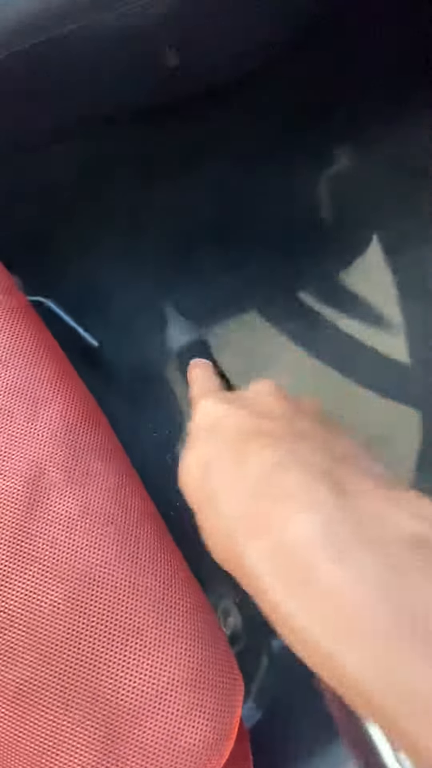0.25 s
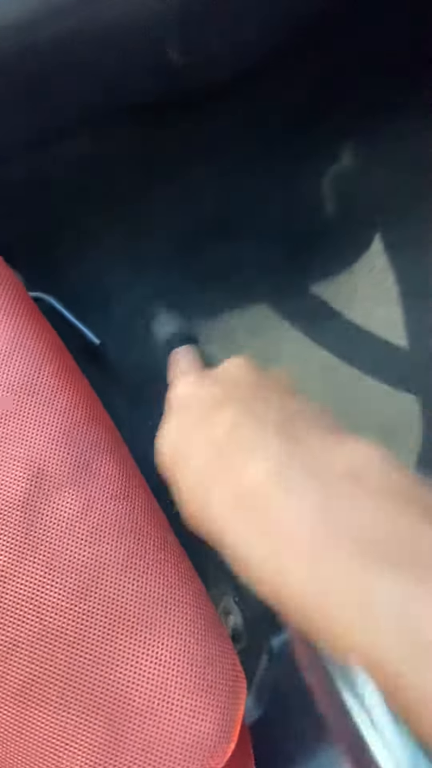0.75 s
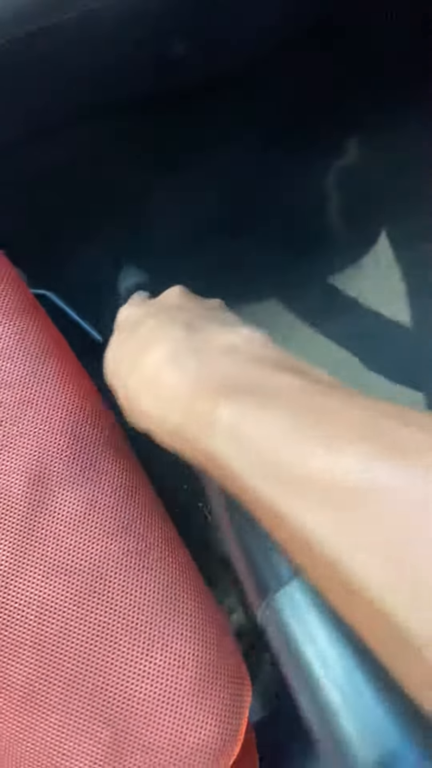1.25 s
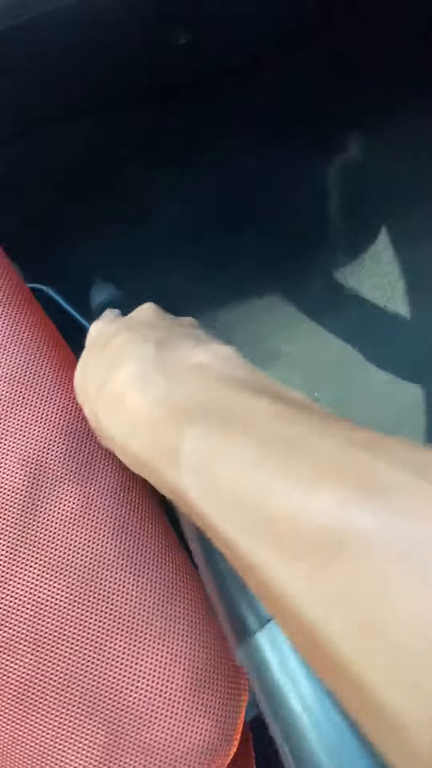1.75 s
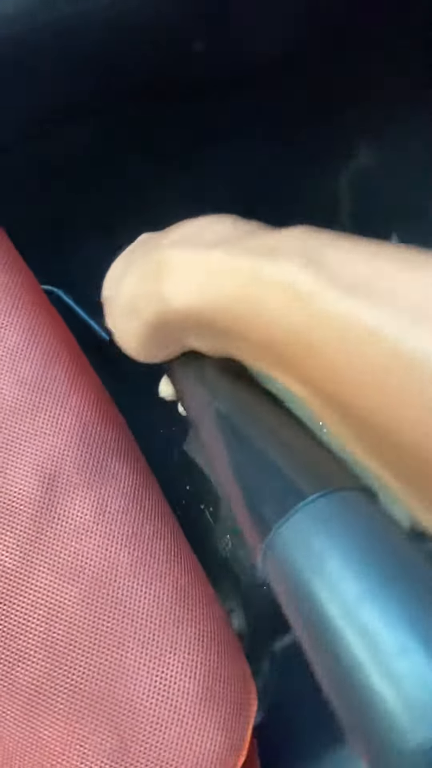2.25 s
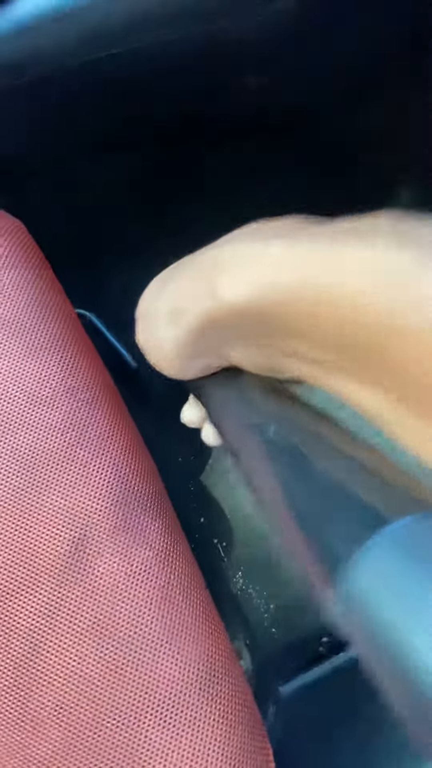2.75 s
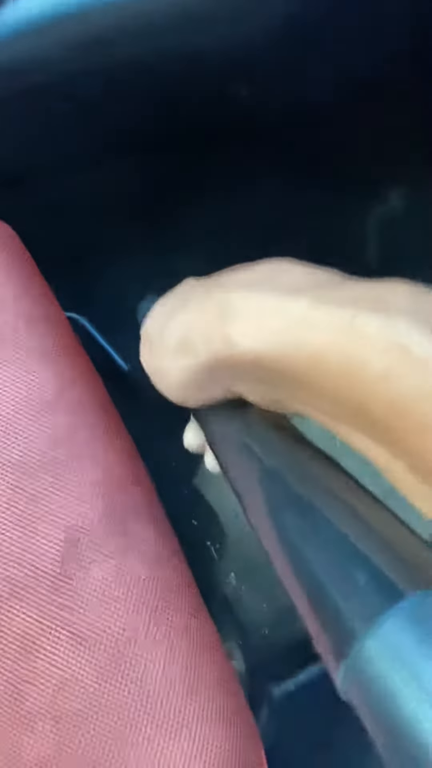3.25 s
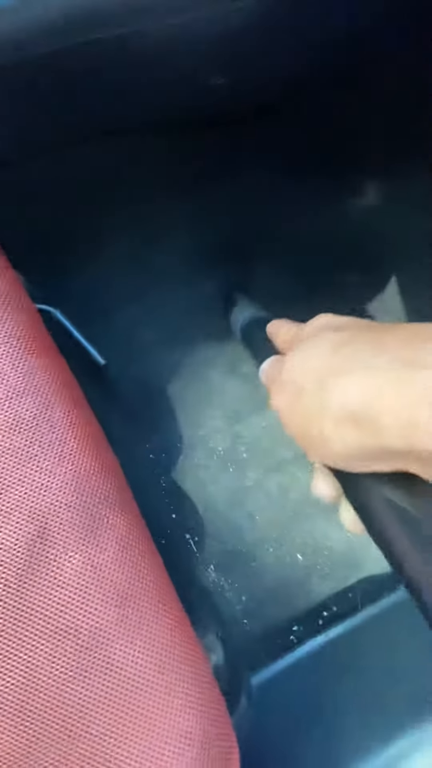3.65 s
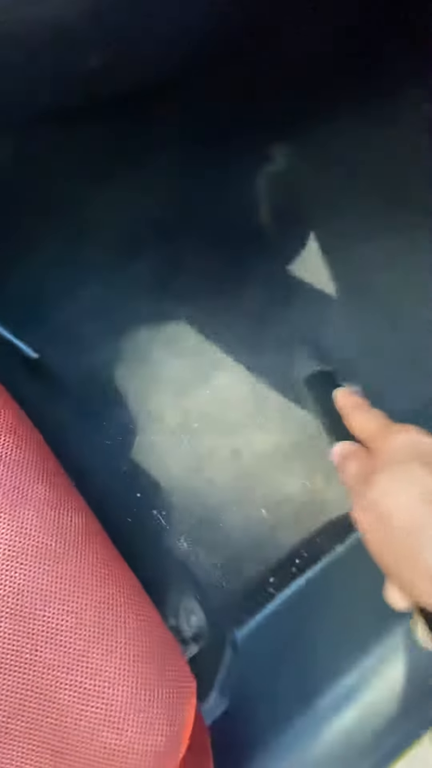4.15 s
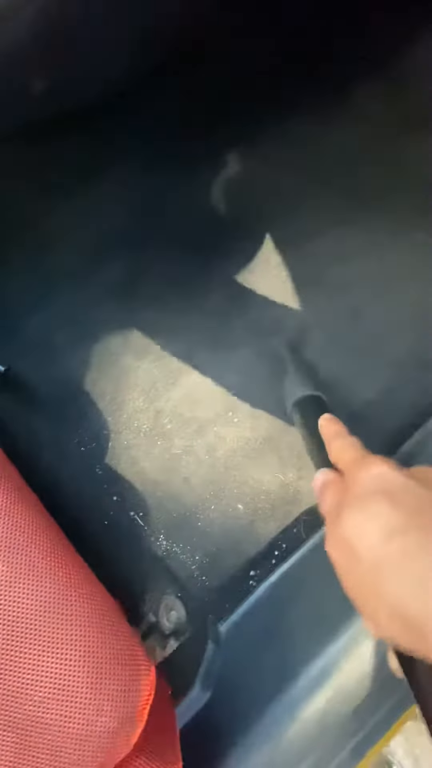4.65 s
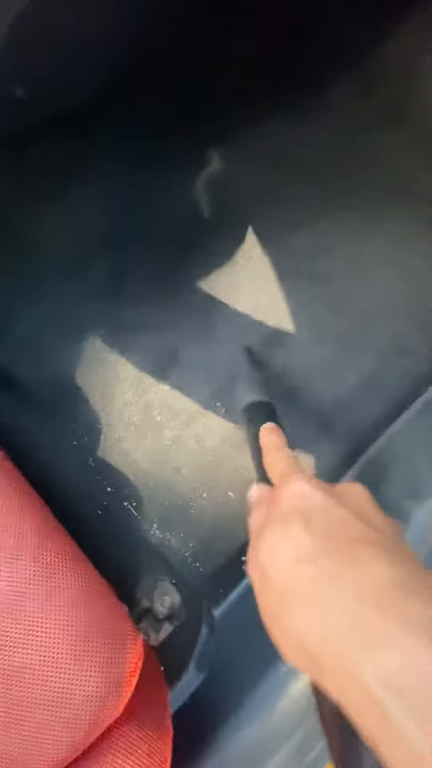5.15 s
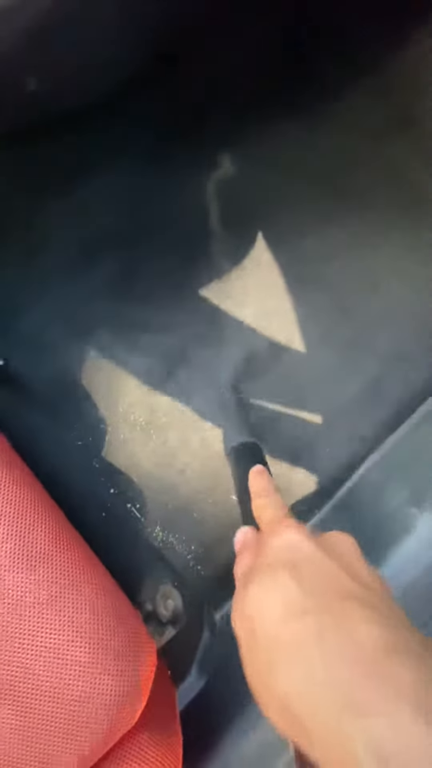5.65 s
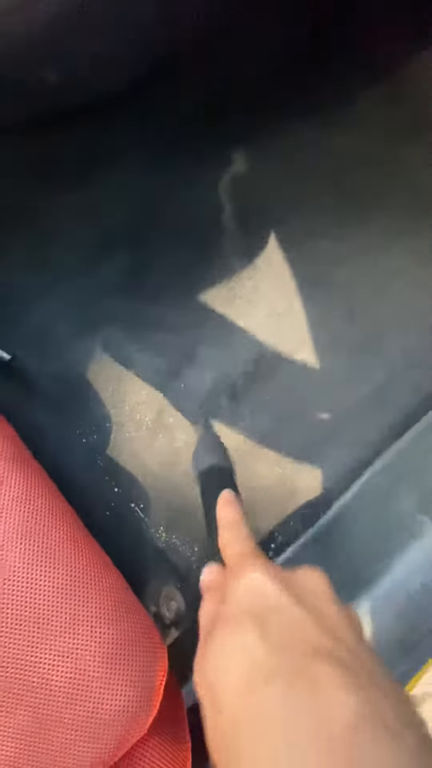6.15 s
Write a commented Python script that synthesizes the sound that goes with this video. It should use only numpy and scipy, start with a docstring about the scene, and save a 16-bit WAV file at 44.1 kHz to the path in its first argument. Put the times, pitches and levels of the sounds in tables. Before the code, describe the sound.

Inside an idling car, a vacuum nozzle sucks and scrubs at the floor mat, knocking sharply against plastic trim.

```python
"""A crevice nozzle works a car floor mat over steady air noise and an idling engine booming in the cabin.
Air hisses in through light strokes; pressed into the pile (0.8-2.2 s) the nozzle roars in the tube's
resonances and raps the trim (1 s). Scrubbing follows, then from 3.4 s lighter brushing and a clearer
motor whine. A crossfade briefly dips the engine's level (4.5 s); a softer rap (5.1 s) and two strokes
(6 s) follow. Left and right are alike in the bass; above 11 kHz the hiss is in opposite polarity."""
import sys
import numpy as np
from scipy import signal
from scipy.fft import rfft, irfft
from scipy.io import wavfile

SR = 44100
rng = np.random.default_rng(int(sys.argv[2]) if len(sys.argv) > 2 else 0)


def unload_wav(signal):
    """Save mono or channel-first audio to the path in sys.argv[1] as 16-bit WAV at rate SR, clipped to [-1, 1]."""
    wavfile.write(
        sys.argv[1],
        SR,
        np.round(np.clip(np.atleast_2d(signal).T, -1, 1) * 32767).astype(np.int16),
    )


N = 282240
T = np.arange(N) / SR
HZ = np.maximum(np.arange(N // 2 + 1) * SR / N, 1)

# Stereo image of far sources, near sources and, in the treble, both:
# (frequency [Hz], left minus right [dB], likeness [0-1], left lead [rad])
FAR_IMAGE = [(30, .3, .999, 0), (122, 1.25, .999, -.1), (250, 2.5, .99, -.1), (400, 3.8, .92, -.1),
             (600, .5, .62, -.95), (1100, 2.5, .43, -1.05), (1600, 0, .55, -.5), (2000, -2, .36, -.8),
             (2900, -2, .75, -2.15), (3800, -2.2, .63, -3.2)]
NEAR_IMAGE = [(400, 2.6, .96, -.16), (500, 4.3, .9, -.86), (600, -1.3, .82, -1.76), (700, -1.9, .66, -1.2),
              (800, 2.7, .9, -1.06), (950, -9, .6, .5), (1100, -1.7, .96, .34), (1300, -3.5, .8, .1),
              (1600, -3, .6, -.6), (2000, .5, .38, -2.6), (2900, -.7, .65, -2.6), (3400, .3, .6, -3.4)]
TREBLE_IMAGE = [(4200, -3, .25, -4.5), (4700, -2.3, .35, -3.2), (5400, -1.5, .68, .1), (6000, -3, .58, .2),
                (7000, 0, .7, .47), (8000, 1.7, .64, 1.78), (9500, 1.8, .55, 1.7), (10500, .8, .7, 2.57),
                (11300, 0, .95, 3.08), (12200, 0, 1, np.pi)]


def amp(db):
    """Decibels to gain."""
    return 10 ** (np.asarray(db) / 20)


def in_time(rows):
    """A (time, value) curve, per sample."""
    return np.interp(T, *np.transpose(rows))


def in_hz(rows):
    """Table columns interpolated over log frequency."""
    hz, *columns = np.transpose(rows)
    return [np.interp(np.log(HZ), np.log(hz), c) for c in columns]


def drift(corner_hz):
    """Slow random wander, standard deviation 1."""
    slow = irfft(rfft(rng.standard_normal(N)) / (1 + (HZ / corner_hz) ** 2), N)
    return slow / slow.std()


def gate(start_s, end_s):
    """Stroke envelope: swells ever faster until it bites, then stops short."""
    swell_s, bite_s, stop_s = 0.05, 0.02, 0.024
    swell = np.clip(1 + (T - start_s - bite_s) / swell_s, 0, 1) ** 3
    return swell * np.sin(np.pi / 2 * np.clip((end_s - T) / stop_s + .5, 0, 1)) ** 2


def resonances(modes):
    """Magnitude spectrum of resonances summed in power."""
    return np.sqrt(sum(amp(db) ** 2 / (1 + ((HZ - hz ** 2 / HZ) / width_hz) ** 2) ** 2
                       for hz, width_hz, db in modes))


def stereo(x, image):
    """Mono to left and right, with the image's balance and phase."""
    balance_db, _, lead_rad = in_hz(image + TREBLE_IMAGE)
    left_gain = amp(balance_db / 2) * np.exp(.5j * lead_rad)
    return irfft(rfft(x) * np.array([left_gain, 1 / left_gain]), N)


def noise(spectrum, image):
    """Coloured noise, partly common to both channels; rms 1."""
    alike = in_hz(image + TREBLE_IMAGE)[1]
    shared, *own = rfft(rng.standard_normal((3, N))) * spectrum
    blends = [irfft(np.sqrt(alike) * shared + np.sqrt(1 - alike) * part, N) for part in own]
    out = np.array([stereo(blend, image)[side] for side, blend in enumerate(blends)])
    return out / out.std()


def steady_air():
    """Airflow and engine rumble; the hose lifts a few bands."""
    spectrum = [(22, -33), (30, 14.5), (110, 11.5), (160, 11.5), (200, 6), (300, 11), (600, -3.5),
                (880, 1.5), (1400, -6.5), (2000, -4), (2900, -3.5), (3800, -15.5), (8000, -13.5),
                (10500, -57), (15000, -11)]  # (frequency [Hz], relative density [dB])
    hose_modes = [(2260, 160, -6), (2950, 120, 3), (4200, 520, 10.5), (4960, 390, 1)]  # (frequency [Hz], width [Hz], gain [dB])
    hose = np.sqrt(1 + resonances(hose_modes) ** 2)
    return amp(-28 + .5 * drift(27)) * noise(hose * amp(in_hz(spectrum)[0]), FAR_IMAGE)


def suction_motor():
    """Thin, wandering whine, heard better once the arm moves off."""
    levels = [(3.3, -48), (3.9, -44), (5.9, -42), (6.1, -48)]  # (time [s], rms level [dB])
    whine_hz = 545.7
    cycles = whine_hz * np.cumsum(1 + 0.00795 * drift(5.5)) / SR
    whine = np.sqrt(2) * amp(in_time(levels) + 1.8 * drift(32)) * np.sin(2 * np.pi * cycles)
    return stereo(whine, FAR_IMAGE)


def engine():
    """Sines on shaft orders: the fourth is the firing note, fractions come from unequal cylinders."""
    idle_speed = [(0.1, 31.33), (0.5, 30.56), (0.7, 30.35), (0.9, 30.54), (1.25, 31.17), (1.7, 31.03),
                  (2.15, 30.53), (2.9, 30.91), (3.3, 30.13), (3.5, 30.36), (4.0, 31.18), (4.25, 31.17),
                  (4.66, 30.33), (5.2, 30.63), (5.7, 30.18), (6.25, 30.12)]  # (time [s], shaft speed [Hz])
    orders = [(1.0, -31), (1.25, -40), (2.0, -31), (2.5, -38), (3.0, -26), (3.25, -41), (3.5, -31),
              (3.625, -31), (3.75, -36), (3.875, -35), (4.0, -9), (4.25, -37), (4.75, -38), (6.0, -44),
              (7.75, -39), (8.0, -29), (9.0, -42), (10.0, -36)]  # (multiple of shaft speed, base rms level [dB])
    cabin_boom = [(0, -3.5), (.5, 0.5), (1.5, -1.5), (2.2, 0), (2.9, -1), (3.4, 0), (4.2, -2), (4.7, 1),
                  (6.4, 1)]  # swell as the listener moves in the cabin: (time [s], gain [dB])
    first_overtone, crest_s = 7, 4.75  # whole orders from here up crest together and throb
    # A splice-like crossfade briefly dips the tone's level and shifts its phase.
    crossfade_s, crossfade_width_s, shift_turns = 4.47, 0.06, 0.114
    shaft_hz = in_time(idle_speed)
    turns = np.cumsum(shaft_hz) / SR
    turns -= turns[int(crest_s * SR)]
    lope_db = 1.5 + 7.5 * (shaft_hz - shaft_hz.mean())
    fade = np.clip((T - crossfade_s) / crossfade_width_s + .5, 0, 1)
    boom_db = in_time(cabin_boom)
    out = np.zeros(N)
    for order, db in orders:
        whole, overtone = order % 1 == 0, order >= first_overtone
        phase = 2 * np.pi * (order * turns + (.25 if whole and overtone else rng.random()))
        tone = (1 - fade) * np.sin(phase) + fade * np.sin(phase - 2 * np.pi * order * shift_turns)
        waver_db = .8 if whole and not overtone else 2.2  # firings differ
        swell_db = boom_db * ((order == 4) + 1.4 * overtone) + lope_db * (order == 2)
        out += np.sqrt(2) * amp(db + swell_db + waver_db * drift(13.5)) * tone
    return stereo(out, FAR_IMAGE)


def trim_raps():
    """The nozzle strikes the trim and rings its modes; in phase on both sides, a little louder right."""
    raps = [(1.0338, 0, 2), (5.1175, -12.5, 9)]  # (time [s], gain [dB], tilt [dB/octave])
    modes = [(1040, -21, 0.023), (1620, -1, 0.013), (2130, 4, 0.013), (2360, -3, 0.022), (2920, -8, 0.014),
             (4200, -1.5, 0.005)]  # (frequency [Hz], relative level [dB], T60 [s])
    pivot_hz, contact_s = modes[2][0], 0.00035
    out = np.zeros(N)
    for start_s, rap_db, tilt in raps:
        age_s = np.maximum(T - start_s, 0)
        contact = 1 - np.exp(-age_s / contact_s)
        for hz, db, t60_s in modes:
            level_db = rap_db + db + tilt * np.log2(hz / pivot_hz) - 9.5
            decay_db = 60 * np.minimum(age_s / t60_s, 4)
            out += contact * amp(level_db - decay_db) * np.sin(2 * np.pi * hz * age_s)
    return out * amp(db=[[-1], [1]])


def gestures():
    """Gains of the nozzle's layers from pressing, scrubbing and brushing; overlaps add in power."""
    press_roar = [(.8, -18), (.83, -25), (.91, -28.5), (1.03, -22.5), (1.14, -29), (1.17, -24), (1.22, -31),
                  (1.28, -23), (1.32, -27.5), (1.37, -24), (1.48, -28.5), (1.57, -18.5), (1.62, -33.5),
                  (1.71, -23), (1.77, -28.5), (1.89, -33), (1.94, -24.5), (2.03, -31), (2.18, -25.5)]  # held in the pile: (time [s], roar [dB])
    press_rub = [(.8, -30.5), (.92, -23), (1.05, -29.5), (1.2, -34.5), (1.85, -35.5), (2.18, -41)]  # pile friction meanwhile: (time [s], rub [dB])
    strokes = [(0.12, 0.217, -43, 0, -37), (0.213, 0.403, -34.5, 0.26, -32), (0.67, 0.804, -44.5, 0.3, -36),
               (2.165, 2.324, -23.5, 0.42, -26), (2.407, 2.516, -23.5, 0.2, -27),
               (2.618, 2.718, -25, 0.7, -38), (2.863, 2.98, -21.5, 0.33, -28.5),
               (3.073, 3.164, -24, 0.37, -34), (3.208, 3.283, -28.5, 0.4, -41),
               (3.271, 3.346, -27.5, 1, -31.5), (5.094, 5.196, -33.5, 1, -35),
               (5.946, 6.005, -36, 0.5, -32), (6.16, 6.305, -26.5, 0.73, -27)]  # scrubbing: (start [s], end [s], roar [dB], hollow share [0-1], rub [dB])
    brushes = [(0.106, 0.436, -49, -39), (0.676, 0.963, -45, -40), (3.414, 3.478, -36.5, -38.5),
               (3.955, 4.207, -40.5, -43), (4.386, 4.487, -39.5, -41), (5.088, 5.165, -37, -36),
               (5.943, 6.001, -33, -45), (6.161, 6.317, -29, -40.5)]  # lip over fibres: (start [s], end [s], swish [dB], rush [dB])
    jet_floor = [(0, -34), (.18, -31), (.22, -26), (.38, -28.5), (.43, -34.5), (.74, -34), (.81, -26),
                 (.95, -29.5), (2.15, -31.5), (2.36, -34.5), (2.8, -33.5), (3.2, -30), (3.5, -34)]  # hiss between strokes: (time [s], level [dB])
    press_hollow_share, hollow_lag_s = 0.2, 0.013  # the hollow sounds late, as a stroke closes it
    held = gate(press_roar[0][0], press_roar[-1][0])
    roar = (held * amp(in_time(press_roar))) ** 2
    rub = (held * amp(in_time(press_rub))) ** 2
    tube, hollow = (1 - press_hollow_share) * roar, press_hollow_share * roar
    scrub = np.zeros(N)
    for start_s, end_s, roar_db, hollow_share, rub_db in strokes:
        envelope = gate(start_s, end_s)
        power = (envelope * amp(roar_db)) ** 2
        tube += (1 - hollow_share) * power
        hollow += hollow_share * np.roll(power, int(hollow_lag_s * SR))
        scrub += power
        rub += (envelope * amp(rub_db)) ** 2
    swish, rush = scrub * amp(-14) ** 2, np.zeros(N)
    for start_s, end_s, swish_db, rush_db in brushes:
        envelope = gate(start_s, end_s)
        swish += (envelope * amp(swish_db)) ** 2
        rush += (envelope * amp(rush_db)) ** 2
    jet = amp(in_time(jet_floor)) ** 2 + scrub * amp(-8) ** 2  # strokes squeeze more air through the gap
    return np.sqrt([tube, hollow, rub, swish, rush, jet, scrub])


def air_hiss(jet_gain):
    """The jet hisses through the gap; the tip adds a whistly band while held down."""
    jet_spectrum = [(2500, 5.5), (3400, 5.5), (4600, 0), (5400, 4), (6500, 1), (8000, 3.5), (10500, 0),
                    (15000, -1.5)]  # (frequency [Hz], relative density [dB])
    tip_modes = [(6000, 380, -7), (6530, 540, -5)]  # (frequency [Hz], width [Hz], relative level [dB])
    tip_levels = [(.7, -46), (.85, -44), (1.6, -43), (2.2, -43.5), (2.75, -37.5), (3.4, -72)]  # (time [s], level [dB])
    highpass = 1 / (1 + (2500 / HZ) ** 4)
    jet = jet_gain * amp(1.4 * drift(11)) * noise(highpass * amp(in_hz(jet_spectrum)[0]), NEAR_IMAGE)
    tip = amp(in_time(tip_levels) + 2.5 * drift(13)) * noise(resonances(tip_modes), NEAR_IMAGE)
    return jet + tip


def tube_roar():
    """Turbulence rings resonances that follow the tube's wandering note."""
    note = [(.3, 1008), (.83, 1040), (1.3, 1083), (2.0, 1135), (2.3, 1094), (3.1, 1147), (3.4, 1056),
            (6.2, 1126)]  # (time [s], frequency [Hz])
    modes = [(1, 141, 5), (1.27, 256, -6.5), (1.55, 400, -16)]  # (ratio to the note, width [Hz], relative level [dB])
    cycles = np.cumsum(in_time(note) * (1 + .02 * drift(14))) / SR
    out = np.zeros(N)
    for ratio, width_hz, db in modes:
        i, q = irfft(rfft(rng.standard_normal((2, N))) / (1 + (2 * HZ / width_hz) ** 2), N)
        phase = 2 * np.pi * ratio * cycles
        out += amp(db) * (i * np.cos(phase) + q * np.sin(phase))
    return stereo(out / out.std(), NEAR_IMAGE)


def nozzle():
    """Tube and hollow roar, fibres scrape past the lip, air hisses above."""
    # Resonances: (frequency [Hz], width [Hz], relative level [dB])
    hollow_modes = [(805, 56, 9.5), (954, 170, 1.5)]  # cavity under the lip
    rub_modes = [(400, 115, -5.5), (477, 42, -2.5), (566, 100, -5), (687, 140, -9.5)]  # rubbed pile
    swish_modes = [(1400, 480, 6), (1820, 910, 5.5), (2390, 620, 7.5), (2800, 630, 5.5), (4500, 2700, 3.5)]  # brushed fibres
    rasp_modes = [(1307, 200, 4), (1800, 150, -2.5)]  # lip dragged through the pile
    rush_modes = [(1890, 220, -4), (2100, 160, 1)]  # air past the lifted lip
    tube_gain, hollow_gain, rub_gain, swish_gain, rush_gain, jet_gain, scrub_gain = gestures()
    judder = drift(18)  # lip over the fibres
    roar = tube_gain * amp(1.5 * judder) * tube_roar()
    hollow = hollow_gain * amp(0.54 * drift(25)) * noise(resonances(hollow_modes), NEAR_IMAGE)
    rub = rub_gain * amp(drift(40)) * noise(resonances(rub_modes), NEAR_IMAGE)
    swish = swish_gain * amp(1.5 * judder + 2.5 * drift(90)) * noise(resonances(swish_modes), FAR_IMAGE)
    rasp = scrub_gain * amp(-9 + 1.5 * drift(70)) * noise(resonances(rasp_modes), NEAR_IMAGE)
    rush = rush_gain * amp(2.8 * judder) * noise(resonances(rush_modes), FAR_IMAGE)
    return roar + hollow + rub + swish + rasp + rush + air_hiss(jet_gain)


def scene():
    """All sources in stereo."""
    return steady_air() + engine() + nozzle() + suction_motor() + trim_raps()


def record(dry):
    """Soft peak limit, then a steep low-pass."""
    ceiling, cutoff_hz = .97, 15700
    rounded = dry / (1 + (dry / ceiling) ** 8) ** (1 / 8)
    return signal.sosfilt(signal.ellip(14, .3, 80, cutoff_hz, fs=SR, output="sos"), rounded)


dry = scene()
out = record(dry)
unload_wav(out)
```